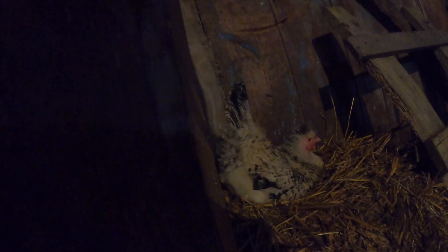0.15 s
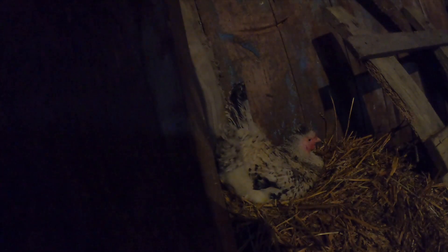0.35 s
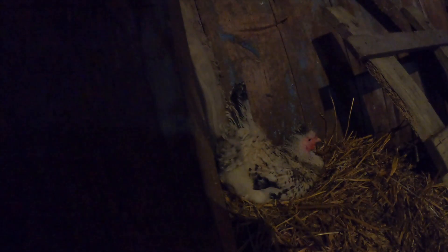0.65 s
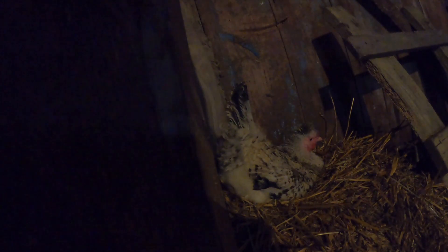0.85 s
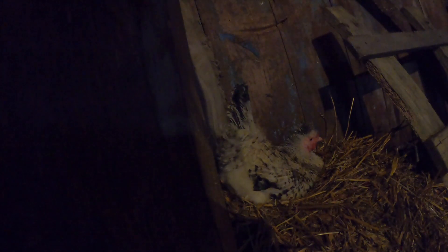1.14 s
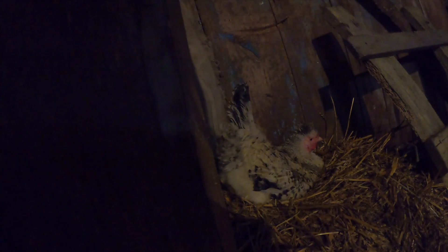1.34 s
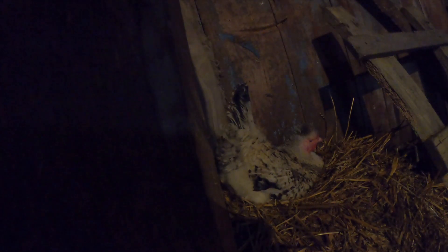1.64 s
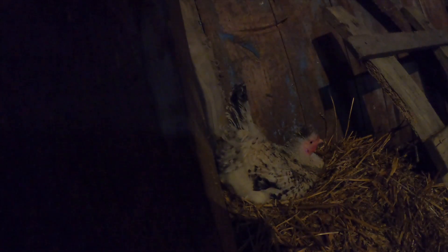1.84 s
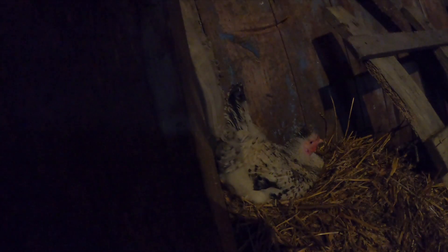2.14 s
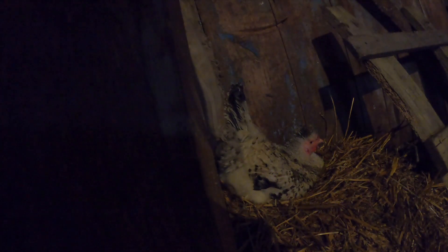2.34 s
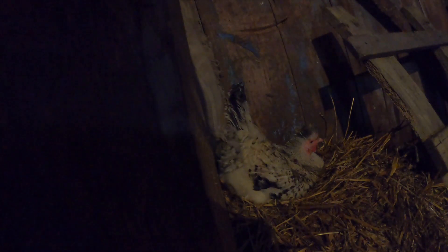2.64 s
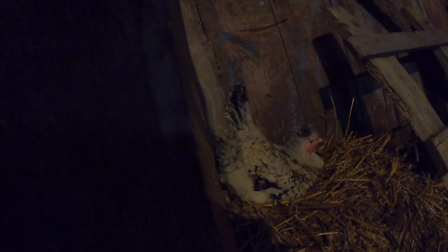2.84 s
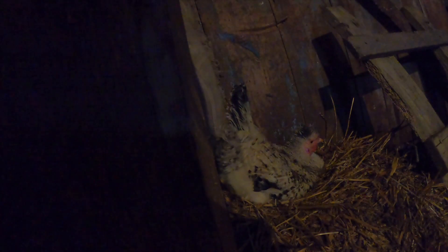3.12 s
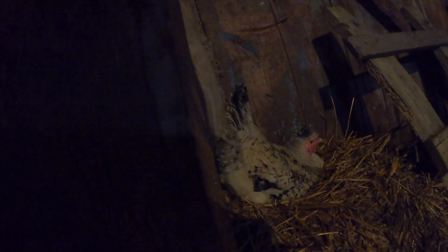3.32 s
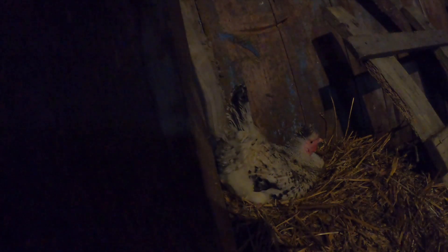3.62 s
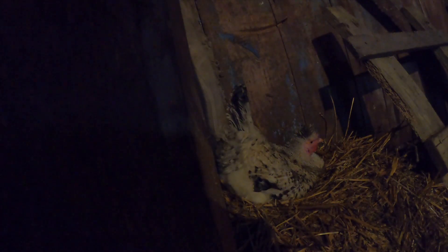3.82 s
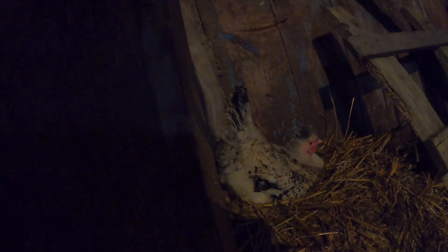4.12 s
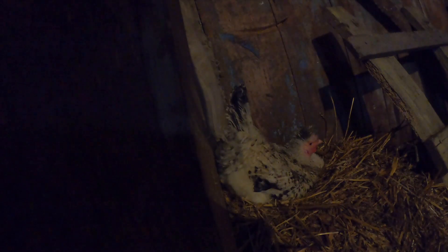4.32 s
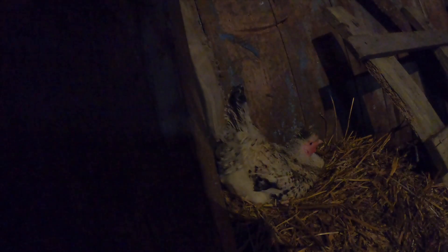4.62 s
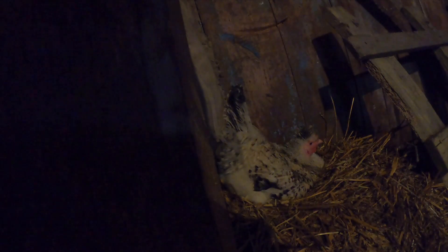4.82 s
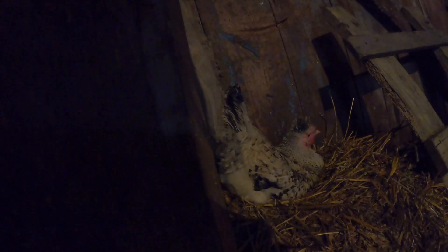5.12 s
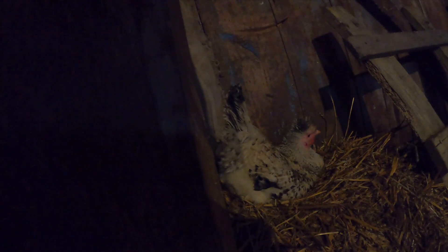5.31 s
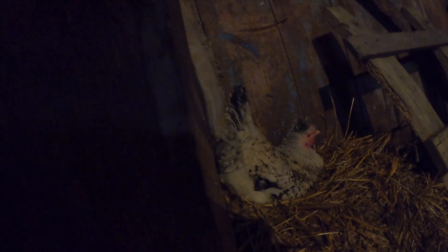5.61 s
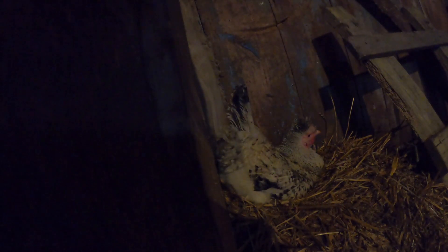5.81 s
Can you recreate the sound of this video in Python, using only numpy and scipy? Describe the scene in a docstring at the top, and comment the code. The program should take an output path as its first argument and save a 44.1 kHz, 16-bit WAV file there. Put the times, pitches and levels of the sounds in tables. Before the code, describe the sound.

In a quiet wooden coop, a hen close on the right gives a low cluck and short rising whine, then later a longer, wavering, broken whine. Straw rustles softly to the left with small snaps and dull thumps on boards. Near the end louder straw movement leads to a metal latch clink and hollow wooden door knocks. Stereo microphone nearby, low hum and faint hiss.

```python
"""A broody hen on a straw nest in a wooden coop whines twice, close by and to the right: thin wavering notes,
nearly pure tones shaped by a throat resonance and broken by catches and small pops.
To the left something shuffles, as crackling noise bands and snapping stalks; weight thumps on the boards.
At the end, also left, a latch clinks and a wooden door knocks and booms, all as ringing modes.
A low drone and rumble, soft microphone hiss and a faint high whine lie under it all."""
import sys
import numpy as np
from scipy import signal
from scipy.fft import rfft, irfft, next_fast_len
from scipy.io import wavfile
from scipy.ndimage import uniform_filter1d

SR = 44100
rng = np.random.default_rng(int(sys.argv[2]) if len(sys.argv) > 2 else 0)


def unload_wav(signal):
    """Save mono or channel-first audio to the path in sys.argv[1] as 16-bit WAV at rate SR, clipped to [-1, 1]."""
    wavfile.write(
        sys.argv[1],
        SR,
        np.round(np.clip(np.atleast_2d(signal).T, -1, 1) * 32767).astype(np.int16),
    )


N = 262836
T = np.arange(N) / SR   # s

# Stereo likeness of the noise bands, clipped to 0..1 once read: pitch_hz, likeness (left-right correlation)
STEREO_LIKENESS = [(60, 0.2), (180, 0.16), (530, 0.27), (1600, 0.21), (4770, -0.26), (14200, -4)]

# Far drone and microphone hiss, relative spectrum: pitch_hz, level_db (per Hz)
DRONE_SPECTRUM = [(59, -42), (100, -44.5), (142, 10.5), (179, 4.5), (395, -6), (770, -10), (836, -11.5),
                  (1190, -6.5), (1700, -15), (6710, -26.5), (9560, -46), (12300, -24.5), (14500, -48)]
# Side the drone leans to: pitch_hz, left_over_right_db
DRONE_SIDE = [(60, 2), (240, -7), (920, -4.5), (3630, 4), (14200, -5.5)]
# Faint steady high tones, level before their flicker: pitch_hz, rms_level_db
HIGH_WHINE = [(6700, -101), (11100, -104.5)]
# Rumble of air and timber, relative spectrum: pitch_hz, level_db (per Hz)
RUMBLE_SPECTRUM = [(18, 0), (30, -5), (55, 3.5), (85, -6.5), (120, -14)]
DRONE_RMS_DB, RUMBLE_MEAN_DB = -66.5, -81

# Shuffles in the straw, levels before crackle and colour: start_s, level_db, t60_s (near 2500 Hz),
# body_db (per two octaves below 2500 Hz), bright_db (per two octaves above), favoured_hz, favoured_db
SHUFFLES = [(0.097, -63, 0.93, 1.5, 7, 2540, -14), (0.465, -58, 0.33, 1.5, -1, 416, -5.5),
            (0.861, -60.5, 0.42, 6, 1.5, 410, -3.5), (1.25, -62.5, 0.54, 3.5, 9, 2400, -2.5),
            (1.288, -62, 0.18, 2.5, -10, 4830, -6), (1.62, -55, 0.19, -9, -26, 3400, -14),
            (1.697, -58.5, 0.35, -7, 1, 3315, -19), (1.927, -67, 0.56, -9, -0.5, 2400, -10),
            (2.065, -58.5, 0.28, 1, -8, 1140, -3), (2.41, -70.5, 0.84, 10, 3.5, 1160, -5),
            (2.838, -58, 0.37, 5.5, 2.5, 2432, -5), (3.365, -60.5, 0.21, 5.5, -3.5, 2258, -13),
            (3.74, -65.5, 0.31, 5.5, 4, 4810, -11), (3.793, -57, 0.3, 3.5, -4.5, 2750, -11),
            (4.047, -59.5, 1, -23, -7, 2640, -15), (4.223, -57.5, 0.27, -11, 7, 2210, -8.5),
            (4.449, -67.5, 0.32, -21, 9, 7570, -27), (4.535, -58.5, 0.29, -48, -9, 3830, -7),
            (4.947, -46.5, 0.25, -5.5, -5.5, 3920, -11.5), (5.348, -59, 0.34, -4, -11.5, 2200, -13.5),
            (5.396, -54, 1, -14, -10.5, 1830, -7), (5.493, -41.5, 0.46, -9.5, -10.5, 3480, -26),
            (5.644, -46.5, 0.51, -9.5, -8.5, 1430, -6), (5.93, -51.5, 0.22, -10.5, -15, 4160, -15.5)]
# Colour of the straw: pitch_hz, level_db (per Hz)
STRAW_SPECTRUM = [(150, -38), (250, -5.5), (416, -4), (879, -10.5), (1150, -5.5), (1490, -8.5), (2280, -10),
                  (6100, -14), (8000, -27), (14500, -52.5)]
# Side the straw leans to: pitch_hz, left_over_right_db
STRAW_SIDE = [(60, 1.0), (240, -5), (920, 1.5), (3630, 5), (14200, -5)]
# Single stalks breaking: start_s, level_db, pitch_hz
STALK_SNAPS = [(2.068, -60.5, 2570), (2.844, -61, 2700), (2.858, -53, 2300), (4.4496, -60.5, 7730),
               (4.948, -45.5, 3700), (4.9557, -46, 5600), (5.9325, -55, 2610)]
SWELL_S, DRAG_SHARE = .016, 0.064   # a shuffle builds this long, then holds for this share of its t60
CRACKLE_PER_S, CRACKLE_SPREAD_DB, CRACKLE_SHARE = 300, 3.8, 0.3

# Weight landing on the boards, last the door: start_s, level_db (before chance)
THUMPS = [(0.499, -62), (0.961, -61.5), (1.769, -66), (2.071, -58), (2.421, -64), (2.85, -52.5),
          (3.421, -60), (5.573, -48), (5.634, -42.5), (5.75, -48.5)]
# Floor and wall modes: pitch_hz, level_db (before chance), t60_s
BOARD_MODES = [(23.4, -13, 0.36), (37.33, -1, 0.45), (52, -4.5, 0.3), (84, -6.5, .2), (172, -5, 0.35)]

# Throat resonance of the hen: pitch_hz, level_db
THROAT = [(500, -3.5), (780, 1.5), (880, -4), (1035, 7), (1180, 8.5), (1225, 7), (1275, 2), (1400, -2),
          (1700, -14), (2100, -33.5), (2700, -26), (4500, -53)]
# The hen's aimed pitch before warble, catches and quaver, one curve a note;
# two phrases, each opened by a low cluck: time_s, pitch_hz
TUNE = [
    [(1.218, 605), (1.23, 572), (1.243, 632), (1.2615, 590)],
    [(1.262, 790), (1.276, 814), (1.282, 656), (1.312, 624)],
    [(1.345, 717), (1.39, 762), (1.412, 797), (1.42, 893), (1.455, 831), (1.462, 766), (1.505, 788),
     (1.54, 953)],
    [(1.57, 944), (1.593, 1026), (1.608, 1165), (1.68, 1229)],
    [(2.957, 616.5), (2.972, 530), (2.988, 507)],
    [(2.99, 678), (3.003, 714), (3.032, 748.5)],
    [(3.036, 791), (3.066, 816), (3.09, 861), (3.105, 761), (3.135, 684)],
    [(3.147, 795), (3.178, 908), (3.195, 839), (3.214, 1024), (3.262, 1082), (3.295, 991), (3.335, 997),
     (3.38, 1023), (3.402, 1350), (3.435, 1412)],
    [(3.514, 794), (3.527, 1033), (3.542, 1249), (3.572, 1253), (3.585, 1383), (3.635, 1320), (3.647, 1116),
     (3.673, 1077), (3.68, 1335), (3.712, 1336)],
    [(3.787, 1109), (3.804, 1217), (3.828, 1469), (3.852, 1217), (3.875, 1124), (3.915, 1215), (3.96, 1382),
     (4.01, 1345), (4.02, 1173), (4.108, 1215), (4.128, 1322), (4.19, 1270), (4.21, 1200), (4.282, 1190),
     (4.292, 1350), (4.313, 1230), (4.323, 1110)],
]
# How each note is blown: effort_db, effort_change_db_per_s, opening_push_db, attack_s, release_s,
# warble_depth_hz, warble_start_turns, overtones_db
BREATH = [(-34, -250, -7, 0.026, 0.011, 3.2, 0.013, 1.5), (-51, -100, 1, 0.0082, 0.0081, 7.4, 0.009, -11),
          (-57.5, 59.5, -3, 0.012, 0.067, 6.7, 0.0091, -10.5), (-44, -100, -8, 0.012, 0.05, 70, 0.44, 5.5),
          (-35.5, -300, 0.7, 0.02, 0.02, 3.7, 0.014, 1.9), (-54, -100, -3, 0.0076, .01, 20, .01, -13),
          (-44.5, -32, 0.1, 0.018, 0.048, 54, .01, -4.5),
          (-46.5, 15.5, -3.5, 0.0051, 0.043, 29, 0.4, -10.5),
          (-47, -21, 7.5, 0.015, 0.034, 45, 0.009, -4.5), (-45.5, 0.5, 6.5, 0.012, 0.014, 13.5, 0.0084, 4)]
# Catches, where the voice flips and chokes for an instant: time_s, flip_hz, dip_db, width_s (Gaussian sigma)
CATCHES = [(1.2453, 8, 4, .002), (1.374, 0, 20, .007), (1.44, 0, 6, .012), (1.63, 50, 12, .003),
           (1.652, 0, 10, .003), (3.302, -190, 11, .004), (3.323, -170, 10, .003), (3.553, 90, 7, .003),
           (3.657, 220, 3, .003), (3.862, 220, 6, .003), (3.881, 110, 0, .003), (3.902, 140, 8, .003),
           (3.918, 90, 4, .002), (3.928, 80, 4, .002), (4.052, 90, 14, .0025), (4.257, 70, 10, .003)]
# Throat snapping open: start_s, level_db, ring_hz, t60_s
THROAT_POPS = [(3.511, -35.5, 597, 0.0074), (3.5143, -41.5, 420.3, 0.012), (3.783, -37, 464, 0.011)]
OVERTONE_STEP_DB = -8   # per overtone, before each note's own overtones_db
QUAVER_HZ, QUAVER_SHARE, TREMOR_DB, FIRM_DB = 60, .03, 3, -44   # FIRM_DB: level at which the wobble halves
PUSH_S, EDGE_DB, WARBLE_PER_S = 0.028, 20, 48.0
HEN_LEAN_DB, HEN_LAG_S, BOOM_LAG_S = -4, .00006, 0.00027   # lean is left over right

# Latch blows, before a common trim: start_s, level_db, bright_db (per octave from the third mode)
LATCH_CLINKS = [(5.4974, -31.5, 3), (5.512, -34, 8), (5.535, -43, -3)]
# Modes of the metal latch: pitch_hz, level_db, t60_s
LATCH_MODES = [(2008, -11, .1), (2536, -14, .12), (2934, -12, .2), (3526, -2, .12), (3715, -9, .07),
               (3973, -9, .06), (4296, -11, .12)]
# Door blows, before a common trim: start_s, level_db, bright_db (per octave from the third mode)
DOOR_KNOCKS = [(5.5555, -29, 1), (5.584, -38, 2), (5.608, -49, -7), (5.658, -44, 20), (5.672, -38.5, 11),
               (5.705, -53, 7)]
# Modes of the wooden door: pitch_hz, level_db, t60_s
DOOR_MODES = [(310, -14, .08), (750, -12, .04), (997, 0, .04), (1110, -8, .03), (1243, -7, .04),
              (1420, -11, .035), (1900, -15, .03)]

COOP_T60_S, WALL_CUT_HZ, HEN_ROOM_DB, DOOR_ROOM_DB = 0.32, 3200, -22, -7.5
CUTOFF_HZ = 15300


def from_db(db):
    """dB to gain."""
    return 10 ** (np.asarray(db) / 20)


def rms_one(x):
    """Scale to rms 1."""
    return x / np.sqrt(np.mean(x ** 2) + 1e-20)


def at_hz(points, hz):
    """Read a table on a log-frequency axis."""
    table = np.array(points)
    return np.interp(np.log(hz), np.log(table[:, 0]), table[:, 1])


def impulse(s):
    """A single unit sample at s seconds."""
    return np.arange(N) == round(s * SR)


def drift(rate_hz):
    """Slow chance of spread 1: noise through two equal low-pass poles, drawn every 20 samples."""
    r = np.exp(-40 * np.pi * rate_hz / SR)
    white = rng.standard_normal(N // 20 + 4002)
    slow = signal.lfilter([1], [1, -2 * r, r * r], white)[4000:]   # the start settles unheard
    return np.interp(np.arange(N) / 20, np.arange(len(slow)), rms_one(slow))


def lean(db):
    """Left and right gains for a source db louder on the left."""
    return from_db([[db / 2], [-db / 2]])


def ring(clicks, hz, t60):
    """Two-pole resonator: a unit click sets a decaying sine of starting height 1 ringing."""
    r = from_db(-60 / (max(t60, .005) * SR))
    w = 2 * np.pi * hz / SR
    return signal.lfilter([0, np.sin(w)], [1, -2 * r * np.cos(w), r * r], clicks + 1e-18)


def bands(low_hz, count, likeness=STEREO_LIKENESS):
    """Half-octave bands of stereo noise, equal power per Hz: yields (centre Hz, band)."""
    edges = low_hz * 2 ** (np.arange(count + 1) / 2)
    white = rng.standard_normal((2, 2, N + 8000))   # neighbouring bands use different noise
    for k, (low, high) in enumerate(zip(edges, edges[1:])):
        band_pass = signal.butter(2, [low, high], "band", fs=SR, output="sos")
        mid, side = signal.sosfilt(band_pass, white[k % 2])[:, 8000:]
        hz = np.sqrt(low * high)
        alike = np.clip(at_hz(likeness, hz), 0, 1)
        yield hz, np.sqrt(1 + alike) * mid + np.sqrt(1 - alike) * side * [[1], [-1]]


def drone():
    """Far hum of air and the hiss of the microphone as unsteady noise bands, with thin flickering high tones."""
    together = drift(1.0)
    noise = 0
    for hz, band in bands(99.7, count=15):
        level_db = at_hz(DRONE_SPECTRUM, hz) + 0.57 * together + 1.8 * drift(15)
        noise = noise + from_db(level_db) * lean(at_hz(DRONE_SIDE, hz)) * band
    whine = 0
    for hz, rms_db in HIGH_WHINE:
        whine = whine + np.sqrt(2) * from_db(rms_db + 1.9 * drift(5.9)) * np.sin(2 * np.pi * hz * T)
    return from_db(DRONE_RMS_DB) * rms_one(noise) + whine


def rumble():
    """Low, lumpy shaking of air and timber: deep noise bands, most alike left and right at the bottom."""
    noise = 0
    for hz, band in bands(17, count=6, likeness=[(30, 1.0), (120, 0.45)]):
        noise = noise + from_db(at_hz(RUMBLE_SPECTRUM, hz)) * band
    return from_db(RUMBLE_MEAN_DB + 2.0 * drift(2.3)) * rms_one(noise)


def crackle():
    """Gain that jumps for a few milliseconds whenever a stalk gives."""
    sizes = from_db(CRACKLE_SPREAD_DB * np.minimum(rng.exponential(1, N), 4))
    gives = sizes * (rng.random(N) < CRACKLE_PER_S / SR)
    r = np.exp(-1 / (0.00065 * SR))   # each jump fades with a 0.65 ms time constant
    return rms_one(1 + CRACKLE_SHARE * signal.lfilter([1], [1, -r], gives + 1e-18))


def swell(s, t60):
    """Start sample and envelope of a shuffle: swells, drags a moment, dies away."""
    at = round((s - SWELL_S) * SR)
    age = T[:min(SR // 2, N - at)]
    dying_s = np.maximum(age - SWELL_S - DRAG_SHARE * t60, 0)
    rise = np.clip(age / (1.31 * SWELL_S), 0, 1) ** 2
    return at, from_db(-60 * dying_s / max(t60, .02)) * rise


def straw():
    """Dense crackle, the treble dying first; each shuffle favours a pitch of its own."""
    out, grain = np.zeros((2, N)), crackle()
    for hz, band in bands(242.6, count=12):
        power, octaves = np.zeros(N), np.log2(hz / 2500)
        for s, level_db, t60, body_db, bright_db, _, _ in SHUFFLES:
            at, shape = swell(s, t60 * (max(hz, 900) / 2500) ** -.2)
            colour_db = body_db * max(-octaves, 0) / 2 + bright_db * max(octaves, 0) / 2
            power[at:at + len(shape)] += (from_db(level_db + colour_db) * shape) ** 2
        spectrum = from_db(at_hz(STRAW_SPECTRUM, hz) - at_hz(STRAW_SPECTRUM, 3400) - 4.0)
        flicker = from_db(2.0 * drift(32))
        out += spectrum * lean(at_hz(STRAW_SIDE, hz)) * np.sqrt(power) * flicker * band
    for s, level_db, t60, _, _, favoured_hz, favoured_db in SHUFFLES:
        at, shape = swell(s, t60)
        common, own = rng.standard_normal(SR // 2), rng.standard_normal((2, SR // 2))
        rung = ring(common + .7 * own, favoured_hz, 7 / favoured_hz)   # t60 of seven cycles
        favoured = rms_one(rung)[:, :len(shape)]
        out[:, at:at + len(shape)] += from_db(level_db + favoured_db) * lean(3.3) * shape * favoured
    return grain * out


def booms():
    """Each thump is a soft push into the floor and wall modes, with strengths and signs of its own."""
    at, out = [round(s * SR) for s, _ in THUMPS], np.zeros(N)
    thump_db = np.array(THUMPS)[:, 1]
    chance = rng.standard_normal((len(at), len(BOARD_MODES), 2))
    soft_push = np.hanning(260) / 130   # about 6 ms
    for k, (hz, mode_db, t60) in enumerate(BOARD_MODES):
        pushes = np.zeros(N)
        strength = from_db(thump_db + mode_db + 1.7 * chance[:, k, 0])
        pushes[at] = strength * np.sign(chance[:, k, 1])
        out += ring(np.convolve(pushes, soft_push)[:N], hz, t60)
    return out


def sung():
    """Aimed pitch, effort and overtone strength: notes attack, hold and release, warbling; catches break in."""
    effort_db, rich_db = np.full(N, -140.), np.zeros(N)
    aimed = np.interp(T, *np.concatenate(TUNE).T)
    for note, breath in zip(TUNE, BREATH):
        db, db_per_s, push_db, attack_s, release_s, warble_hz, turns, overtones_db = breath
        start, end = note[0][0], note[-1][0]
        on = slice(round(start * SR), round(end * SR))
        age = T[on] - start
        attack = np.clip(1 - age / max(attack_s, .002), 0, 1) ** 2
        release = np.clip(1 - (end - T[on]) / max(release_s, .008), 0, 1) ** 2
        push = push_db * np.exp(-(age / PUSH_S) ** 2)
        effort_db[on] = db + db_per_s * age + push - EDGE_DB * (attack + release)
        rich_db[on] = overtones_db
        aimed[on] -= warble_hz * np.cos(2 * np.pi * (WARBLE_PER_S * age + turns))
    for s, flip_hz, dip_db, width_s in CATCHES:
        catch = np.exp(-.5 * ((T - s) / width_s) ** 2)
        aimed += flip_hz * catch
        effort_db -= dip_db * catch
    return aimed, effort_db, rich_db


def hen():
    """A nearly pure, quavering tone; overtones only speak where they fall on the throat resonance."""
    aimed, effort_db, rich_db = sung()
    aimed = uniform_filter1d(aimed, size=150)
    throat_db = at_hz(THROAT, aimed)
    overtone_db = OVERTONE_STEP_DB + rich_db
    gain = uniform_filter1d(from_db(effort_db + throat_db), size=120)   # loud where pitch meets throat
    loudest = gain * (1 + from_db(overtone_db + at_hz(THROAT, 2 * aimed) - throat_db))
    slack = 1 / (1 + loudest / from_db(FIRM_DB))   # weakly blown membranes wobble more
    pitch = aimed * (1 + QUAVER_SHARE * slack * drift(QUAVER_HZ))
    gain = gain * from_db(TREMOR_DB * slack * drift(43))
    phase = 2 * np.pi * np.cumsum(pitch) / SR
    # the quaver slides every partial along the flank of the throat, so the level throbs with it
    tone = 0
    for k in (1, 2, 3):
        partial_db = overtone_db * (k - 1) + at_hz(THROAT, k * pitch) - throat_db
        hoarse = 1 if k == 1 else 1 + .55 * slack * drift(80)   # overtones are unsteady
        tone = tone + from_db(partial_db) * hoarse * np.sin(k * phase)
    out = np.sqrt(2) * gain * tone
    soft = np.hanning(24) / 12   # flesh makes a rounded click
    for s, level_db, hz, t60 in THROAT_POPS:
        click = np.convolve(from_db(level_db) * impulse(s), soft)[:N]
        out += ring(click, hz, t60) + 0.2 * ring(click, 1400, 0.05)
    return out


def snaps():
    """Single stalks break with a bright tick that has a duller partner below."""
    ticks = 0
    for s, level_db, hz in STALK_SNAPS:
        click = from_db(level_db) * impulse(s)
        ticks = ticks + ring(click, hz, .007) + .6 * ring(click, .66 * hz, .008)
    return ticks * lean(2.4)


def struck(blows, modes, chatter_s, trim_db):
    """Each blow drives every mode for a moment, partly in step with it and partly as a rough chatter."""
    out, length = np.zeros(N), round(chatter_s * SR)
    for hz, mode_db, t60 in modes:
        drive = np.zeros(N)
        octaves = np.log2(hz / modes[2][0])
        for s, blow_db, bright_db in blows:
            at = round((s - chatter_s / 4) * SR)
            in_step = 2 * np.sin(2 * np.pi * (hz * T[:length] + rng.random())) / length
            rough = .5 * rng.standard_normal(length) / np.sqrt(length)
            strength = from_db(blow_db + mode_db + trim_db + bright_db * octaves)
            drive[at:at + length] += (in_step + rough) * np.hanning(length) * strength
        out += ring(drive, hz, t60)
    return out


def latch_and_door():
    """Metal latch modes clink, then wooden door modes knock."""
    latch = struck(LATCH_CLINKS, LATCH_MODES, chatter_s=0.015, trim_db=-6.5)
    return latch + struck(DOOR_KNOCKS, DOOR_MODES, chatter_s=0.01194, trim_db=-0.59)


def coop(x):
    """Wooden walls around the microphone: eight feedback delays a side, duller on every round."""
    size = next_fast_len(N + SR)
    w = 2 * np.pi * np.arange(size // 2 + 1) / size   # radians per sample
    dull = 1 / (1 + 1j * w * SR / (2 * np.pi * WALL_CUT_HZ))
    walls = np.zeros((2, len(w)), complex)
    for k, lag in enumerate(rng.uniform(.008, 0.028, 16) * SR):   # lag in samples
        loop = from_db(-60 * lag / SR / COOP_T60_S) * dull * np.exp(-1j * w * lag)
        walls[k % 2] += loop / (1 - loop) * (-1) ** (k // 2)
    return irfft(rfft(x, size) * walls, size)[:, :N]


def scene():
    """The hen sits to the right, reaching the left side late; latch and door stand to the left."""
    voice, door, boom = hen(), latch_and_door(), booms()
    hen_lr = np.array([np.interp(T - HEN_LAG_S, T, voice), voice]) * lean(HEN_LEAN_DB)
    boom_lr = np.array([boom, np.interp(T - BOOM_LAG_S, T, boom)]) * lean(1.5)
    room = coop(from_db(HEN_ROOM_DB) * voice + from_db(DOOR_ROOM_DB) * door)
    near = hen_lr + door * lean(5.5) + straw() + snaps() + boom_lr
    return near + room + drone() + rumble()


def record(dry):
    """A steep low-pass cuts the top."""
    return signal.sosfilt(signal.cheby2(12, 50, CUTOFF_HZ, fs=SR, output="sos"), dry)


dry = scene()
out = record(dry)
unload_wav(out)
```